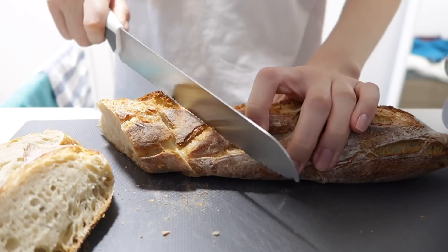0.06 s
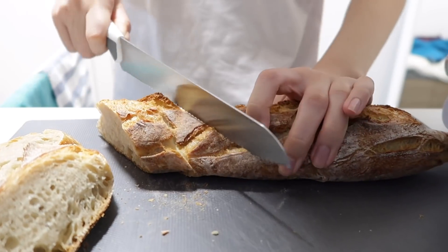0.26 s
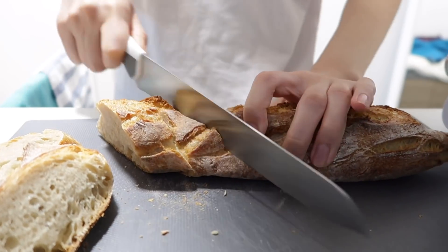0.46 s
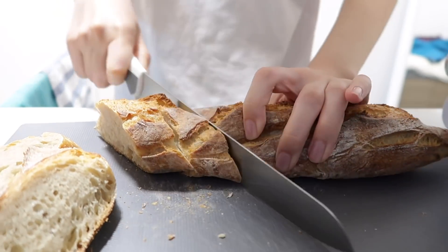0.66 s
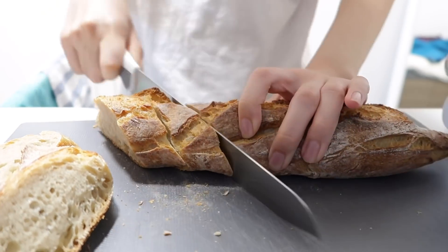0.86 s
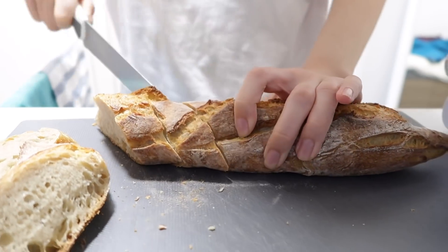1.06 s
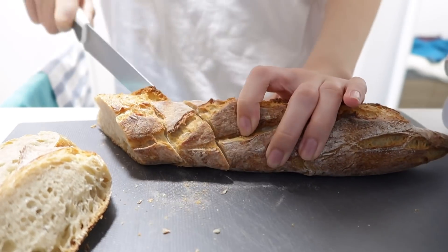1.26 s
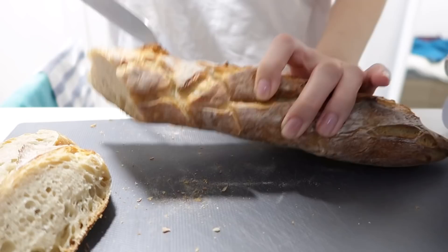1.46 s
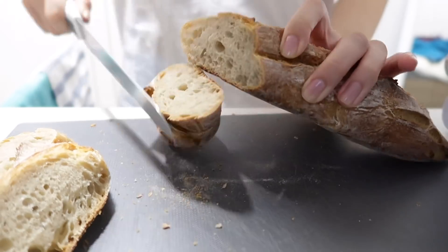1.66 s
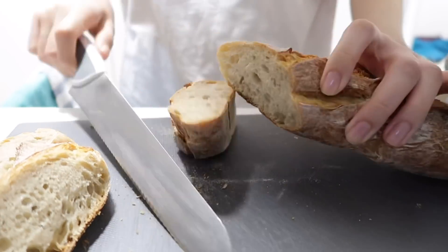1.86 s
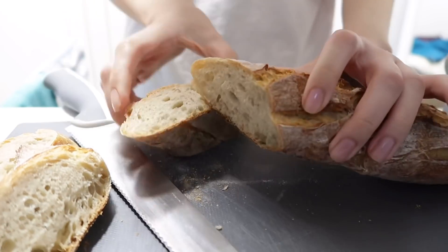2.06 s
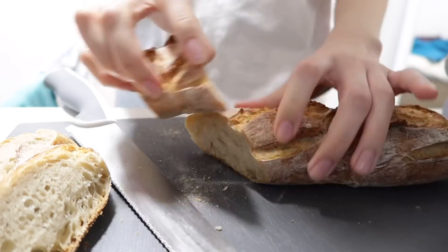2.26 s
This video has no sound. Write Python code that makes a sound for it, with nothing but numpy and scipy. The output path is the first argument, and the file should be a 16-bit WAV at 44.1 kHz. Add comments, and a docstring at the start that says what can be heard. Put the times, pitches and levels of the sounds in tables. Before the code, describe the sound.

A serrated knife saws through a crusty baguette in short, rapid jerks after a small squeak, crumbling crust with low woody buzzes; a pause, then crust snaps and the knife clacks down. Close, dry, quiet kitchen.

```python
"""A serrated knife saws through a crusty baguette, close by: a squeak, then a push and a pull in short jerks.
The teeth pluck damped loaf resonances while dense grains of noise crumble the crust; binding blades groan.
Noise bursts crack and snap the last crust, with hollow decaying tocks; struck modes lay down the knife.
Swelling grains and a soft murmur brush the slice, over a faint kitchen echo and room tone."""
import sys
import numpy as np
from scipy import signal
from scipy.fft import rfft, irfft
from scipy.io import wavfile
from scipy.ndimage import uniform_filter1d

SR = 44100
rng = np.random.default_rng(int(sys.argv[2]) if len(sys.argv) > 2 else 0)


def persist_wave(psi):
    """Save psi, clipped to +-1, as 16-bit WAV."""
    counts = np.round(np.clip(psi, -1, 1) * 32767).astype(np.int16)
    wavfile.write(sys.argv[1], SR, np.atleast_2d(counts).T)


N = 101430
T = np.arange(N) / SR

# Jerks of the blade: middle_s, length_s, mid_jerk_tooth_rate_hz, glide_octaves, loaf_level_db,
# crumbling_level_db
JERKS = [(0.082, 0.047, 400, -0.0091, -29.5, -53.5), (0.241, 0.054, 437.4, 0.11, -30.5, -43),
         (0.288, 0.046, 391.6, 0.091, -20.5, -34), (0.339, 0.06, 252, -0.78, -21, -30.5),
         (0.404, 0.039, 428, 0.48, -16, -31), (0.453, 0.058, 438.6, -0.086, -27, -30.5),
         (0.471, 0.034, 309, -0.0093, -19.5, -35), (0.52, 0.053, 477, 0.4, -15.5, -34),
         (0.569, 0.039, 481.4, 0.7, -20.5, -26.5), (0.637, 0.048, 434, 0.59, -17.5, -36.5),
         (0.696, 0.088, 246, -0.27, -31.5, -38.5), (.786, 0.061, 491.7, -0.18, -32, -30),
         (0.851, 0.066, 415.5, 0.072, -22.5, -29), (.922, 0.045, 508, 0.32, -18, -31.5),
         (0.976, 0.058, 443, -0.13, -31, -27.5), (1.034, 0.049, 446.5, -0.35, -37, -32),
         (1.07, .07, 471.6, -0.515, -17.5, -31), (1.137, 0.034, 525, 0.37, -22, -35.5),
         (1.167, 0.052, 239.5, 0.48, -24, -38), (1.189, 0.058, 483.6, 0.38, -45, -29),
         (1.253, 0.059, 414, 0.38, -30.5, -32), (1.279, .066, 385.2, -1.024, -17.5, -36.5),
         (1.322, 0.06, 224.8, -0.56, -30, -45.5), (1.365, 0.048, 431.5, -0.15, -24, -37.5),
         (1.454, 0.069, 450.7, -0.4, -37.5, -50)]
# Loaf on its board: resonance_hz, half_bandwidth_per_pass_hz, level_db
LOAF_RESONANCES = [(275, 94, 5.5), (402.4, 123, 21.5), (1190, 110, -29)]
# Groans of the binding blade: middle_s, length_s, mid_groan_slip_rate_hz, glide_octaves, level_db
GROANS = [(.785, .04, 610, 0, -28), (.838, .046, 750, -.6, -29), (.975, .04, 1150, .2, -40),
          (1.17, .044, 620, .7, -33)]
# Stiff shell of crust: resonance_hz, half_bandwidth_per_pass_hz, level_db
CRUST_RESONANCES = [(663, 224, 2), (1200, 170, 0), (2140, 600, -11)]
# Colour of crumbling crust: frequency_hz, relative_level_db
CRUMBLE_COLOUR = [(120, -17), (400, 21.5), (950, 0), (1250, 7.5), (2200, 3.5), (2900, -2), (5200, 1),
                  (10000, -3), (16000, -10.5)]
# Colour of single flakes: frequency_hz, relative_level_db
CHIP_COLOUR = [(200, -6), (2000, 0.5), (7500, 12), (16000, 2.5)]
# Flakes of crust cracking: start_s, level_db
CRACKS = [(0.385, -39), (0.472, -21), (0.4732, -33.5), (0.5036, -25), (.545, -38), (0.5577, -25),
          (0.672, -46), (0.89, -34.5), (1.008, -33.5), (1.369, -40.5), (1.6362, -36), (1.6456, -35),
          (1.6533, -34.5), (1.6655, -30.5), (1.853, -44), (1.952, -38)]
# Course of the blade's squeak: time_s, pitch_hz, level_db
SQUEAK_COURSE = [(.200, 1090, -54), (.213, 1035, -38), (.218, 955, -32), (.238, 948, -30), (.274, 820, -42)]
# Squeak partials from the fundamental up: relative_level_db
SQUEAK_HARMONICS_DB = [-4.5, -0.5, 3, -4, 0.5]
# Crust breaking or bumped: start_s, crunch_level_db, thump_level_db, crunch_t60_s
SNAPS = [(1.5607, -46, -39, 0.014), (1.579, -34, -43, 0.05), (1.6001, -40.5, -49, 0.031),
         (1.6193, -37, -40, 0.052), (1.6801, -30, -31.5, 0.0088), (1.691, -17.5, -21.5, 0.042),
         (1.746, -42.5, -44.5, 0.055), (1.897, -25, -23.5, 0.079), (1.9994, -16.5, -21.5, 0.012),
         (2.28, -28, -31.5, 0.11)]
# Colour of the crunches: frequency_hz, relative_level_db
SNAP_COLOUR = [(150, -11), (450, 15.5), (850, -26), (1250, -4.5), (2150, 2), (2700, -4), (3500, 6),
               (7500, 2), (16000, -16.5)]
# Knife meeting the board: mode_hz, relative_level_db, t60_s
KNIFE_MODES = [(1392, -1.5, 0.03), (2105, 4.5, 0.018), (2820, -2, 0.013), (5110, -7.5, 0.031)]
# Crust rubbing on blade, board and fingers: middle_s, length_s, rustle_level_db, loaf_level_db
RUBS = [(0.077, 0.69, -58, -52), (1.524, 0.12, -46, -52), (1.68, 0.12, -41, -51.5),
        (1.862, 0.14, -36.5, -49), (1.95, 0.17, -47.5, -46), (2.153, .026, -33, -44),
        (2.234, 0.095, -50, -53)]
# Colour of the rustle: frequency_hz, relative_level_db
RUB_COLOUR = [(250, -14), (4300, 3.5), (8500, 0), (16000, -13.5)]
# Colour of the room tone: frequency_hz, relative_level_db
ROOM_COLOUR = [(100, -22.5), (200, 3), (420, -5.5), (800, -14.5), (16000, -32)]
# Stereo width: frequency_hz, side_against_mid_db
WIDTH = [(350, -79), (1000, -19.5), (4000, -27.5), (14000, -13)]
# Hollow tocks of the crust as it tears or is knocked: start_s, pitch_hz, level_db
TOCKS = [(1.582, 784, -37), (1.6215, 737, -35), (2.001, 1240, -28.5)]

# Blade: share of tooth rate lost at standstill, timing scatter in teeth or slips, pluck size scatter in dB
RATE_SAG, TOOTH_JITTER, SLIP_JITTER, TOOTH_SCATTER_DB = .42, .025, .06, 2
JERK_SHAPE, LOAF_DAMP_HZ = 1.3, 595  # exponent of speed; low-pass on the plucked loaf
# Crumbling: lead of its swell, length against the jerk's, exponent of the swell, depth of tooth pulsing
CRUMBLE_LEAD_S, CRUMBLE_STRETCH, CRUMBLE_SHAPE, TOOTH_GATE = 0.00402, 1.146, 1.77, .55
GRAINS_PER_S, RUB_GRAINS_PER_S = 3600, 1700
GRAIN_SCATTER_DB, GRAIN_T60_S, GRAIN_TAIL_DB = 6, .008, -4.5
FLICKER_DB, FLICKER_PER_S = 4.5, 30.7  # rms swing before limiting; inverse of the smoothing time
CRACK_T60_S, TOCK_T60_S = 0.025, 0.028
BITE_S, BITE_HZ, BITE_DB, BITE_T60_S = .1905, 11450, -29.5, 0.011
PARTIAL_LEAD_S, PARTIAL_FADE_S = .0075, .016  # each higher partial ends this much sooner; fade-out time
THUMP_T60_S, THUMP_PUSH_DB = 0.048, 10
KNIFE_S, KNIFE_DB = 1.895, -15.5
ROOM_DB, ECHO_DB, ECHO_T60_S = -56.5, -16.5, 0.12
TOP_HZ = 16200


def undb(db):
    """Turn decibels into gain."""
    return 10 ** (np.asarray(db) / 20)


def unit(x):
    """Scale to rms 1."""
    return x / np.sqrt(np.mean(x ** 2) + 1e-20)


def burst(x):
    """Scale a short sound to rms 1 as if it lasted 5 ms."""
    return x / np.sqrt(np.sum(x ** 2) / (.005 * SR))


def add(out, start_s, x):
    """Mix x into out from start_s, trimming whatever falls outside."""
    i = int(start_s * SR)
    x, i = x[max(-i, 0):], max(i, 0)
    out[i:i + len(x)] += x[:max(N - i, 0)]


def gains(points, n):
    """Read a (Hz, dB) curve as the gain at each bin of an n-point spectrum."""
    hz, db = np.array(points).T
    bin_hz = np.arange(n // 2 + 1) * SR / n
    return undb(np.interp(np.log(bin_hz + 1), np.log(hz), db))


def colour(x, points, size=1024):
    """Shape a spectrum with a minimum-phase filter that keeps the power of white noise."""
    cepstrum = irfft(np.log(gains(points, size)))
    # Folding the cepstrum makes the filter causal.
    cepstrum[1:size // 2] *= 2
    cepstrum[size // 2 + 1:] = 0
    impulse = irfft(np.exp(rfft(cepstrum)))
    return signal.fftconvolve(x, impulse / np.linalg.norm(impulse))[:len(x)]


def fade(t60, size=8192):
    """Decay exponentially by 60 dB in t60 seconds."""
    return np.exp(-np.log(1000) * T[:size] / t60)


def tail(t60, size=8192):
    """Make decaying noise of energy 1."""
    x = rng.standard_normal(size) * fade(t60, size)
    return x / np.linalg.norm(x)


def mode(hz, t60):
    """Ring one struck resonance as a decaying cosine."""
    decay = fade(t60)
    return decay * np.cos(2 * np.pi * hz * T[:len(decay)])


def arch(length_s):
    """Swell and ebb as half a sine."""
    return np.abs(np.sin(np.linspace(0, np.pi, int(length_s * SR))))


def loaf(x, resonances=LOAF_RESONANCES):
    """Ring the broad, damped resonances of the loaf or its crust, each filtered in two passes."""
    out = 0
    for hz, width, db in resonances:
        b, a = signal.iirpeak(hz, hz / (2 * width), fs=SR)
        once = signal.lfilter(b, a, x)
        out = out + undb(db) * signal.lfilter(b, a, once)
    return out


def grains(per_s):
    """Scatter dense tiny fractures of uneven size, each with a short noisy tail."""
    hits = (rng.random(N) < per_s / SR) * rng.choice([-1, 1], N)
    hits = hits * undb(GRAIN_SCATTER_DB * np.minimum(rng.standard_normal(N), 2.5))
    spread = signal.fftconvolve(hits ** 2, fade(GRAIN_T60_S) ** 2)[:N]
    tails = unit(np.sqrt(np.abs(spread)) * rng.standard_normal(N))
    return unit(unit(hits) + undb(GRAIN_TAIL_DB) * tails)


def flicker(x):
    """Shift the crust's colour from flake to flake with a wandering level in each quarter-octave band."""
    spectrum, out = rfft(x), 0
    bin_hz = np.arange(N // 2 + 1) * SR / N
    place = 4 * np.log2(np.clip(bin_hz, 500, 16000) / 500)
    hold = int(SR / FLICKER_PER_S)
    for band in range(21):
        walk = uniform_filter1d(rng.standard_normal(N), hold)
        walk = unit(uniform_filter1d(walk, hold))
        db = FLICKER_DB * walk.clip(-2, 2)
        slope = np.maximum(1 - np.abs(place - band), 0)
        out = out + irfft(spectrum * slope, N) * undb(db)
    return out


def tooth_phase(speed, hz, glide):
    """Count teeth or slips: the rate follows the blade's speed and glides through the stroke."""
    bend = 2 ** (glide * np.linspace(-.5, .5, len(speed)))
    rate_hz = hz * (1 - RATE_SAG * (1 - speed)) * bend
    return np.cumsum(rate_hz) / SR


def room_tone():
    """Lay down the steady coloured noise of the quiet kitchen."""
    return undb(ROOM_DB) * colour(rng.standard_normal(N), ROOM_COLOUR)


def echo(near):
    """Spread the close sound into a faint decaying echo."""
    return undb(ECHO_DB) * signal.fftconvolve(near, tail(ECHO_T60_S, size=16384))[:N]


def rubs():
    """Slide crust lightly: swelling grains give a fine rustle, resonated noise a soft murmur of the loaf."""
    rustle, body = np.zeros(N), np.zeros(N)
    for middle_s, length_s, rustle_db, body_db in RUBS:
        start_s = middle_s - length_s / 2
        add(rustle, start_s, undb(rustle_db) * arch(length_s) ** 3.14)
        add(body, start_s, undb(body_db) * arch(length_s))
    murmur = body * unit(loaf(rng.standard_normal(N)))
    return flicker(colour(rustle * grains(RUB_GRAINS_PER_S), RUB_COLOUR)) + murmur


def knife():
    """Clack the knife on the board: a few struck modes, damped short by the hand."""
    out, ring = np.zeros(N), 0
    for k, (hz, db, t60) in enumerate(KNIFE_MODES):
        ring = ring + (-1) ** k * undb(db) * mode(hz, t60)
    add(out, KNIFE_S, undb(KNIFE_DB) * burst(ring))
    return out


def tocks():
    """Ring the crust hollow as its hinge gives in small steps, and once more when it is knocked."""
    out = np.zeros(N)
    for start_s, hz, db in TOCKS:
        add(out, start_s, undb(db) * burst(mode(hz, TOCK_T60_S)))
    return out


def snaps():
    """Break or bump the crust: a rough noise crunch and a thump through the loaf's resonances."""
    crunch, thump = np.zeros(N), np.zeros(N)
    for start_s, crunch_db, thump_db, t60 in SNAPS:
        noise = tail(t60)
        rough = noise * undb(rng.standard_normal(len(noise)))
        add(crunch, start_s, undb(crunch_db) * burst(rough))
        push = undb(THUMP_PUSH_DB) * tail(THUMP_T60_S)
        push[0] += 1  # a click at first contact
        add(thump, start_s, undb(thump_db) * burst(loaf(push, LOAF_RESONANCES[1:])))
    return colour(crunch, SNAP_COLOUR) + thump


def cracks():
    """Break off larger flakes with a dry tick: a very short and a longer noise decay."""
    out = np.zeros(N)
    for start_s, db in CRACKS:
        add(out, start_s, undb(db) * burst(tail(0.004) + 1.23 * tail(CRACK_T60_S)))
    return colour(out, CHIP_COLOUR)


def squeak():
    """Bite with a bright tick, then stick and slip: the pitch drops, holds for a moment,
    then sags as it fades; top partials die first."""
    time_s, hz, db = np.array(SQUEAK_COURSE).T
    waver = unit(uniform_filter1d(rng.standard_normal(N), size=100))
    pitch_hz = np.interp(T, time_s, hz) * (1 + 0.0034 * waver)
    phase = 2 * np.pi * np.cumsum(pitch_hz) / SR
    sizes = undb(SQUEAK_HARMONICS_DB)
    tone = 0
    for k, size in enumerate(sizes):
        release = np.clip((time_s[-1] - k * PARTIAL_LEAD_S - T) / PARTIAL_FADE_S, 0, 1)
        tone = tone + size * np.sin((k + 1) * phase) * release
    tone = tone / np.sqrt(np.sum(sizes ** 2) / 2)
    out = tone * undb(np.interp(T, time_s, db)) * (T > time_s[0])
    tick = signal.lfilter(*signal.iirpeak(BITE_HZ, 9, fs=SR), tail(BITE_T60_S))
    add(out, BITE_S, undb(BITE_DB) * burst(tick))
    return out


def groans():
    """Bind the blade so it slips unevenly: gliding pulses sweep the woody resonances of the crust."""
    out = np.zeros(N)
    for middle_s, length_s, hz, glide, db in GROANS:
        chance = rng.standard_normal((128, 2))
        speed = arch(length_s)
        phase = tooth_phase(speed, hz, glide)
        count = np.arange(1, int(phase[-1]))
        at = np.searchsorted(phase, count + SLIP_JITTER * chance[count, 0])
        slips = np.zeros(len(speed))
        slips[at] = undb(TOOTH_SCATTER_DB * chance[count, 1])
        groan = unit(speed * loaf(slips, CRUST_RESONANCES))
        add(out, middle_s - length_s / 2, undb(db) * groan)
    return out


def sawing():
    """Speed up and slow the blade in each jerk; every tooth plucks the loaf and crumbles some crust."""
    body, crumble = np.zeros(N), np.zeros(N)
    for middle_s, length_s, hz, glide, body_db, crumble_db in JERKS:
        chance = rng.standard_normal((128, 2))
        speed = arch(length_s)
        phase = tooth_phase(speed, hz, glide)
        teeth = np.arange(1, int(phase[-1]))
        at = np.searchsorted(phase, teeth + TOOTH_JITTER * chance[teeth, 0]).clip(0, len(speed) - 1)
        plucks = np.zeros(len(speed) + SR // 20)  # 50 ms of room to ring out
        plucks[at] = speed[at] ** JERK_SHAPE * undb(TOOTH_SCATTER_DB * chance[teeth, 1])
        ring = signal.lfilter(*signal.butter(6, LOAF_DAMP_HZ, fs=SR), loaf(plucks))
        # Match the energy of the ring to that of the shaped jerk.
        ring = ring / np.sqrt(np.sum(ring ** 2) / np.sum(speed ** (2 * JERK_SHAPE)))
        add(body, middle_s - length_s / 2 - .003, undb(body_db) * ring)

        crumble_s = length_s * CRUMBLE_STRETCH
        press = arch(crumble_s)
        gate = 1 + TOOTH_GATE * np.cos(2 * np.pi * tooth_phase(press, hz, glide))
        swell = undb(crumble_db) * press ** CRUMBLE_SHAPE * gate
        add(crumble, middle_s - crumble_s / 2 - CRUMBLE_LEAD_S, swell)
    return body + flicker(colour(crumble * grains(GRAINS_PER_S), CRUMBLE_COLOUR))


def scene():
    """Set everything close and central, with a faint kitchen echo, room tone and a little width."""
    near = sawing() + groans() + cracks() + squeak() + snaps() + tocks() + knife() + rubs()
    mid = near + echo(near) + room_tone()
    # The side is the mid, varied in level at random and turned by 90 degrees.
    drift = unit(uniform_filter1d(rng.standard_normal(N), size=300))
    side = irfft(1j * rfft(mid * drift) * gains(WIDTH, N), N)
    return np.array([mid + side, mid - side])


def record(dry):
    """Cut the top with a steep low-pass."""
    return signal.sosfilt(signal.ellip(8, .2, 70, TOP_HZ, fs=SR, output="sos"), dry)


dry = scene()
out = record(dry)
persist_wave(out)
```